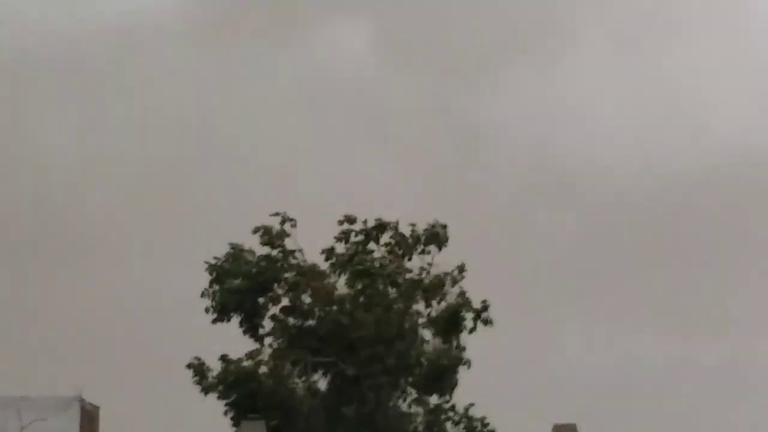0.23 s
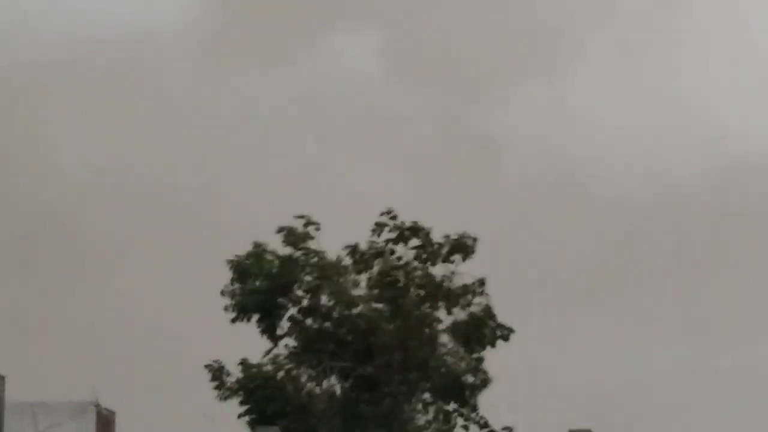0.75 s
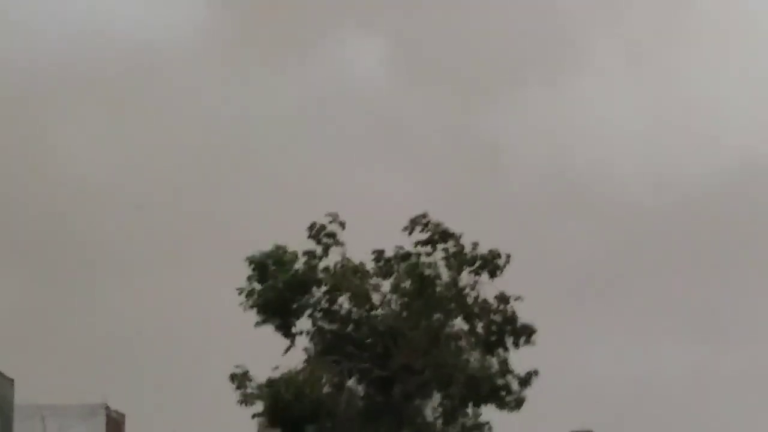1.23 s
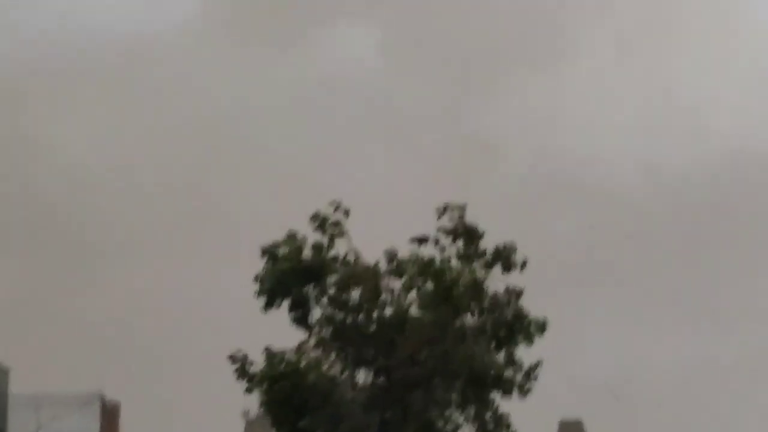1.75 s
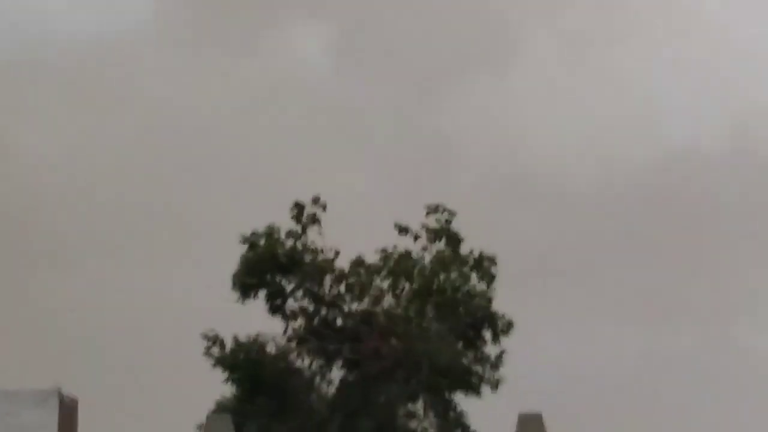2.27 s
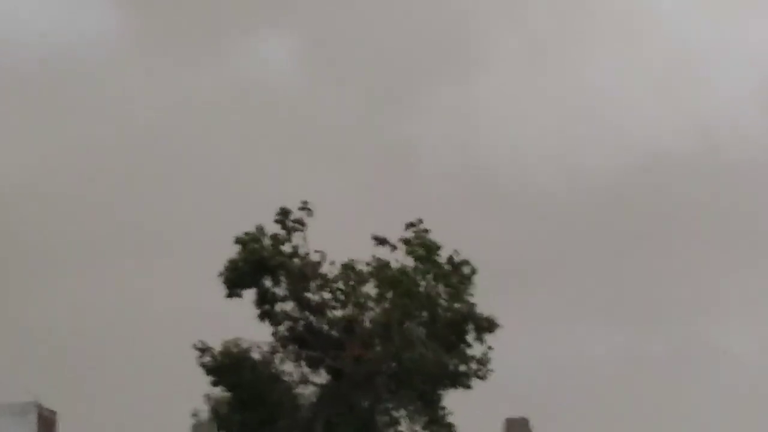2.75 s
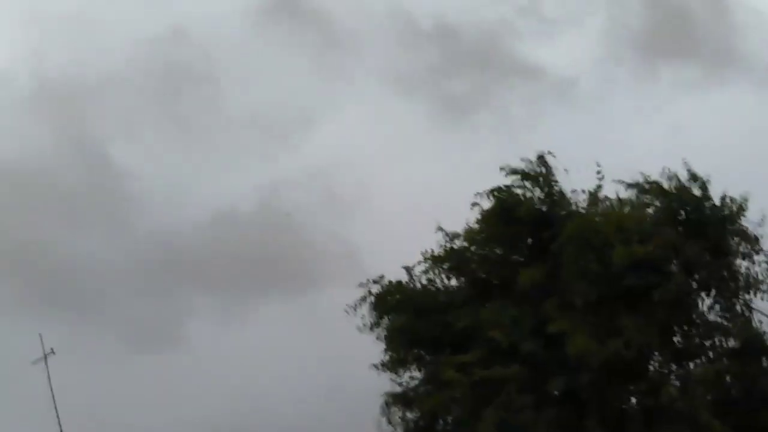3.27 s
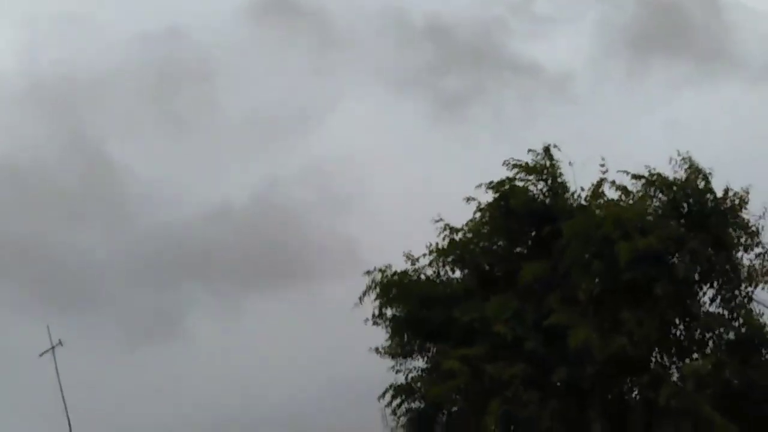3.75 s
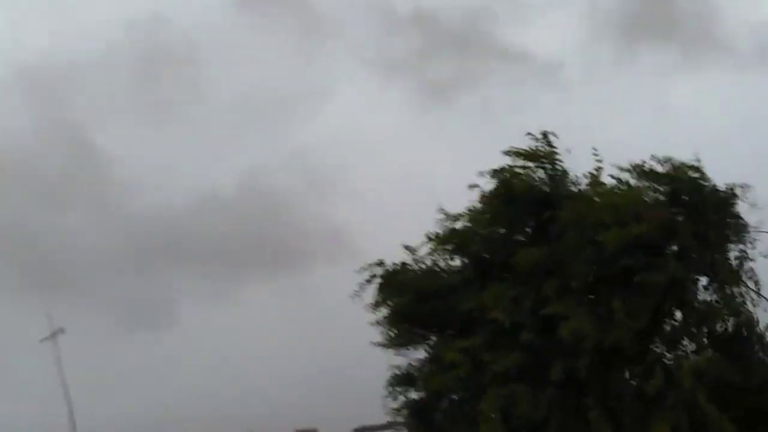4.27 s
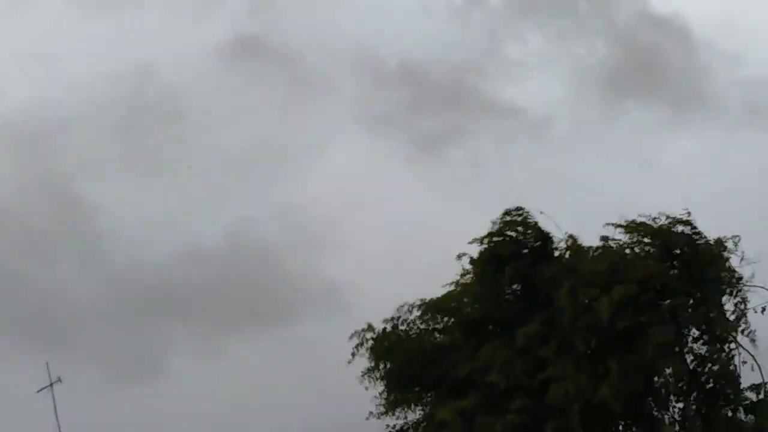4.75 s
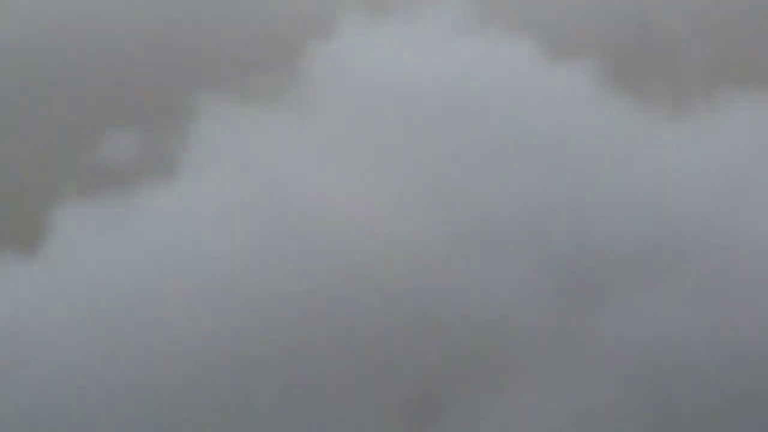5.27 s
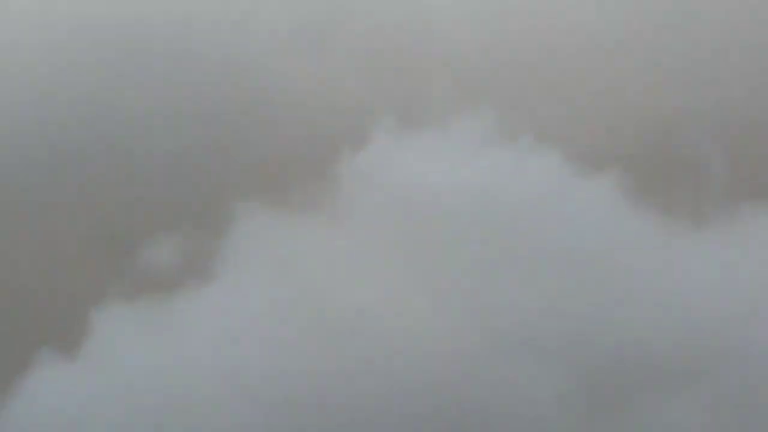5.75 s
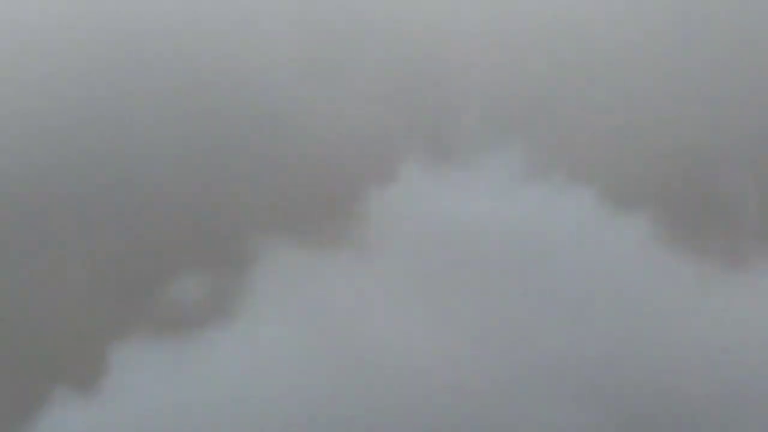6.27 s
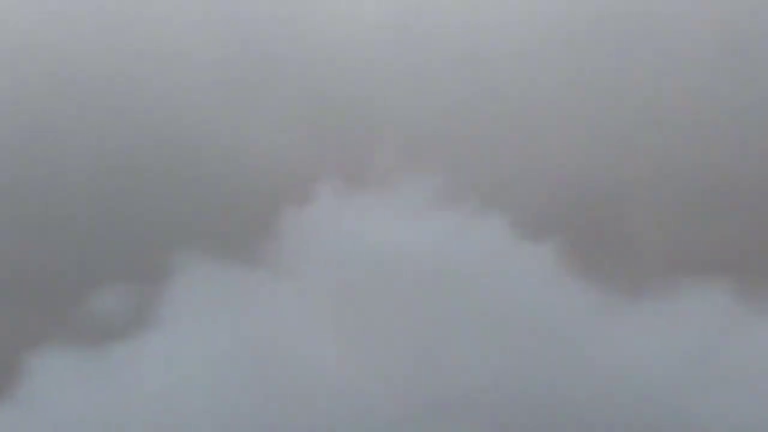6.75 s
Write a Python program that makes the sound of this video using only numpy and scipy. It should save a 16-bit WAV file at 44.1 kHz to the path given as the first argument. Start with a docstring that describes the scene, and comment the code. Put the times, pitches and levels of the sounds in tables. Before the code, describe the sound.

Stormy gusts slam a microphone with violent rumble, thumps and ragged roar, then ease into hissing, rustling leaves across three abruptly separated outdoor passages.

```python
"""Storm wind on a microphone

Three passages of outdoor wind, split by short silences, reach a left and a right microphone opening (port).
Gusts buffet each port: random pushes make a low rumble, and bursts of noise make a rough roar.
Single thumps, crackles, ticks and two spells of brushing come on top, all close to the ports.
Behind them, shaped noise makes rustling leaves, bright bursts, faint tones, a metallic rattle and far wind.
These surroundings are heard on the left, and only very weakly on the nearly shut right port."""
import sys
import numpy as np
from scipy import signal
from scipy.fft import rfft, irfft, next_fast_len
from scipy.io import wavfile
from scipy.ndimage import uniform_filter1d, map_coordinates

SR = 44100
rng = np.random.default_rng(int(sys.argv[2]) if len(sys.argv) > 2 else 0)


def store_pcm(level_fs):
    """Save levels as 16-bit WAV."""
    pcm = np.round(np.clip(level_fs, -1, 1) * 32767).astype(np.int16)
    wavfile.write(sys.argv[1], SR, np.atleast_2d(pcm).T)


N = 309141
TIME = np.arange(N) / SR  # seconds

# Tone colour of the large eddies (whirls of air), the small ones and their sharpest spits:
# columns: pitch_hz, relative_level_db_per_hz
LARGE_EDDY_COLOUR = [(15, -45.5), (30, -29.5), (45, -25.5), (62, -5), (90, 1), (120, -3), (160, -8.5),
                     (240, -16.5), (400, -38), (1500, -81)]
SMALL_EDDY_COLOUR = [(30, -47), (110, -12.5), (190, -0.5), (300, 1.5), (420, -5), (600, -11), (850, -25),
                     (1450, -36), (2500, -50.5), (6000, -72.5)]
SPIT_COLOUR = [(300, -15), (700, 26.5), (1300, 3), (2200, -7), (4000, -24), (8000, -26.5), (14000, -74)]
# Light breeze between gusts, one value per passage: level_db
BREEZE_LEFT_DB = [-42.5, -39.5, -43.5]
BREEZE_RIGHT_DB = [-40.5, -41.5, -46]
# Gusts that hit the microphone: start_s, hold_s, left_rumble_db, right_rumble_db
GUSTS = [(0.29, 0.028, -50, -40), (0.59, 0.16, -49, -31.5), (0.82, 0.064, -43.5, -33.5),
         (1.14, 0.035, -30.5, -28), (1.24, 0.064, -23, -29), (1.37, 0.049, -14.5, -16.5),
         (1.45, 0.05, -9.5, -19), (1.53, 0.049, -13, -21), (1.64, 0.07, -25.5, -26),
         (1.74, 0.057, -14, -10), (1.927, 0.043, -8.5, -32), (2.035, 0.033, -7.5, -6),
         (2.15, 0.071, -6, -10.5), (2.29, 0.056, -9, -18.5), (2.37, 0.25, -13.5, -10),
         (2.67, 0.06, -13.5, -15.5), (2.75, 0.18, -12, -19), (3.015, 0.055, -15.5, -12.5),
         (3.19, 0.062, -36.5, -20), (3.32, 0.03, -39, -23.5), (3.45, 0.11, -24, -25.5),
         (3.61, 0.02, -43, -31.5), (3.86, 0.13, -26, -44), (4.04, 0.06, -33.5, -40),
         (4.35, 0.046, -28, -50), (4.83, 0.16, -36.5, -32.5), (5.31, 0.04, -31.5, -48.5),
         (5.49, 0.4, -28.5, -34), (5.89, 0.076, -39, -24.5), (6.02, 0.084, -43, -36.5),
         (6.735, 0.043, -31.5, -33), (6.9, 0.062, -43, -35)]
GUST_RISE_DB_PER_S, GUST_FALL_DB_PER_S = 354, 271
# Moments when the flow tears off the ports and roars: start_s, hold_s, left_db, right_db
TEARS = [(1.46, 0.1, -26, -42), (1.75, 0.1, -27.5, -31.5), (1.935, 0.035, -18.5, -52.5),
         (2.056, 0.027, -8.5, -13), (2.116, 0.028, -9.5, -30), (2.217, 0.012, -9, -26),
         (2.305, 0.09, -15.5, -28), (2.41, 0.085, -14.5, -17.5), (2.54, 0.047, -9, -21),
         (2.736, 0.048, -10.5, -38), (2.8, 0.12, -18.5, -45.5), (3.028, 0.033, -10, -28.5)]
TEAR_RISE_DB_PER_S, TEAR_FALL_DB_PER_S = 606, 397


def buffet(breeze_db, channel, edge_offset_db, edge_growth, spit_db):
    """Turbulence at one port: the harder the wind, the more its small, sharp eddies are heard."""
    gust_db = blows(GUSTS, GUST_RISE_DB_PER_S, GUST_FALL_DB_PER_S, channel=channel)
    breeze = amp(per_passage(breeze_db)) * flicker(rate_hz=6.3, depth_db=-1.0)
    pressure_db = 20 * np.log10(np.hypot(amp(gust_db), breeze))
    tearing_db = blows(TEARS, TEAR_RISE_DB_PER_S, TEAR_FALL_DB_PER_S, channel=channel)

    # about 300 eddies a second, each one push or pull on the diaphragm
    eddies = rng.standard_normal(N) * (rng.random(N) < 300 / SR)
    large = steadied(coloured(eddies, LARGE_EDDY_COLOUR), span_s=0.073) * amp(pressure_db)

    # their sharp edges grow faster than the rumble until the pressure reaches -13 dB
    edge_db = pressure_db + edge_offset_db + edge_growth * np.minimum(pressure_db + 13.0, 0)
    edges = coloured(eddies * flicker(rate_hz=20, depth_db=5.5), SMALL_EDDY_COLOUR) * amp(edge_db)

    # small eddies come in bursts, and the peaks of the bursts spit
    bursts = flicker(rate_hz=45.0, depth_db=5.5)
    small = steadied(noise(SMALL_EDDY_COLOUR) * bursts, span_s=0.036) * amp(tearing_db)
    spit_level_db = tearing_db + spit_db + 0.4 * (tearing_db + 21.5)
    spits = noise(SPIT_COLOUR) * unit(bursts ** 0.98) * amp(spit_level_db)
    return large + edges + small + spits


# Single eddies that thump or slap a port: time_s, peak_db, port (0 left, 1 right), core_width_s
PUFFS = [(0.615, -21, 1, 0.001), (1.14, -18.5, 1, 0.00069), (1.158, -15, 0, 0.00072),
         (1.374, -12.5, 1, 0.00078), (1.631, -6, 0, .00073), (1.749, -10, 1, 0.00042),
         (1.799, -7, 0, 0.00039), (1.837, -4.5, 0, 0.00062), (1.926, -8.5, 0, 0.00037),
         (1.939, -1.5, 0, 0.00037), (2.012, -7.5, 0, 0.00026), (2.057, -5, 1, 0.00025),
         (2.064, 1.5, 0, .0005), (2.117, -3.5, 0, 0.00027), (2.142, -4, 0, 0.00033), (2.201, -1, 1, .00073),
         (2.219, -3.5, 0, 0.00023), (2.365, -0.5, 0, 0.00036), (2.386, -5.5, 0, 0.00033),
         (2.537, -5, 0, 0.00034), (2.587, -0.5, 0, 0.00027), (2.684, -1.5, 0, 0.00032),
         (3.02, -3, 1, 0.00052), (3.203, -5.5, 1, 0.00063), (3.354, -11.5, 1, 0.0014),
         (3.458, -12, 0, 0.00077), (3.54, -7.5, 0, 0.00071), (3.732, -17.5, 1, 0.00085),
         (3.87, -15, 0, 0.0011), (3.956, -13, 0, 0.00084), (4.916, -20, 1, 0.001),
         (4.982, -16.5, 1, 0.00069), (6.914, -17.5, 1, 0.0008)]


def puffs():
    """A lone eddy sweeps a port: a broad thump around a tight core."""
    out = np.zeros((2, N))
    for time_s, peak_db, port, core_s in PUFFS:
        near = abs(TIME - time_s) < .04
        t = TIME[near] - time_s
        sharp = np.clip(0.47 + 0.016 * peak_db, 0, 1)  # stronger eddies have more core
        shape = (1 - sharp) * vortex(t, 2.4 * core_s) + sharp * vortex(t, core_s)
        out[int(port > .5), near] += amp(peak_db) * shape
    return out


def vortex(t, width_s):
    """Pressure under a passing whirl of air: a suction between two soft pushes."""
    u = (t / width_s) ** 2
    return (u - 1) * np.exp(-u / 2)


# The diaphragm crackles at the height of the gust:
# columns: time_s, left_peak_db, right_peak_db, half_length_s, top_hz; peaks are before the final low-pass
CRACKLES = [(2.413, -11, -4, 0.0015, 2700), (2.552, -16, -46, 0.0022, 2000),
            (2.562, -19.5, -45, 0.0012, 2200), (2.585, -17, -46, 0.003, 1100),
            (2.746, -9, -42, 0.002, 1300)]
CRACKLE_LIMIT_HZ = 8500


def crackles():
    """A few milliseconds of ragged flutter when the flow slams a port: brief bursts of filtered noise."""
    out = np.zeros((2, N))
    for time_s, left_db, right_db, length_s, top_hz in CRACKLES:
        near = abs(TIME - time_s) < .02
        band = signal.butter(2, [500, np.clip(top_hz, 700, 9000)], "bandpass", fs=SR, output="sos")
        swell = np.exp(-((TIME[near] - time_s) / length_s) ** 2)
        burst = signal.sosfilt(band, rng.standard_normal((2, near.sum())) * swell)
        out[:, near] += burst / abs(burst).max(1, keepdims=True) * amp([[left_db], [right_db]])
    return signal.sosfilt(signal.butter(8, CRACKLE_LIMIT_HZ, fs=SR, output="sos"), out)


# Ticks and knocks on the housing beside the right port: time_s, peak_db, ring_hz, decay_s
TICKS = [(3.943, -19, 400, 0.0006), (4.073, -19, 220, 0.0005), (4.103, -16, 1200, 0.00013),
         (4.164, -19, 800, 0.0003), (4.166, -12.5, 420, 0.0005), (5.591, -32, 4500, 0.0003),
         (6.575, -14.5, 5400, 0.0001), (6.735, -14.5, 1100, 0.00009)]


def ticks():
    """Each touch is one clean, ringing pulse that the housing quickly damps."""
    out, t = np.zeros(N), np.arange(2048) / SR
    for time_s, peak_db, ring_hz, decay_s in TICKS:
        pulse = t * np.exp(-t / decay_s) * np.sin(2 * np.pi * ring_hz * t)
        out[round(time_s * SR):][:len(t)] += amp(peak_db) * pulse / abs(pulse).max()
    return out


# Tone colour of the brushing: pitch_hz, relative_level_db_per_hz
BRUSH_COLOUR = [(150, 5), (400, -1.5), (1200, -7.5), (2500, -10.5), (5000, -16.5), (8000, -22.5),
                (10500, -57)]
# Something presses harder over the right port until it slips off, and later grazes it lightly:
# columns: start_s, hold_s, level_db
BRUSH_STROKES = [(3.96, 0.11, -46), (4.075, 0.06, -39), (4.165, 0.009, -32), (4.19, 0.16, -59),
                 (6.57, 0.16, -56), (6.735, 0.1, -53)]
BRUSH_RISE_DB_PER_S, BRUSH_FALL_DB_PER_S = 900, 1300


def brush():
    """Scratchy friction right at the port: noise with a fast, rough flicker."""
    level_db = blows(BRUSH_STROKES, BRUSH_RISE_DB_PER_S, BRUSH_FALL_DB_PER_S)
    return noise(BRUSH_COLOUR) * flicker(rate_hz=300, depth_db=7.0) * amp(level_db)


# Level of the trees between surges, one value per passage: level_db
CALM_RUSTLE_DB = [-44.5, -45, -51.5]
# Gusts that run through the trees: peak_s, half_length_s, rise_above_calm_db
SURGES = [(0.15, 0.32, 4.5), (1.202, 0.64, 3), (2.422, 0.24, 2), (3.346, 0.12, 6), (3.927, 0.14, 3),
          (4.528, 0.14, 4), (4.94, 0.4, 10.5), (5.74, 0.17, 2.5), (6.043, 0.12, 7), (6.712, 0.4, 8.5)]


def rustle_db():
    """The trees never rest, and each gust that runs through them lifts the rustle in a smooth swell."""
    swells_db = sum(db * np.exp(-((TIME - peak_s) / length_s) ** 2) for peak_s, length_s, db in SURGES)
    return per_passage(CALM_RUSTLE_DB) + swells_db


# Tone colour of each passage's leaves, broad, fine and further off: pitch_hz, relative_level_db_per_hz
BROAD_LEAVES = [(1000, -18.5), (2000, -8), (2600, -4.5), (3200, -1), (3850, 3.5), (4400, -1.5),
                (5200, -12.5), (6500, -18.5), (9000, -28), (14000, -35.5)]
FINE_LEAVES = [(1000, -14), (2400, -10), (3300, -7), (4300, -3.5), (5200, -0.5), (6000, 3), (7000, -4.5),
               (8300, -16.5), (10000, -57), (14000, -74)]
FAR_LEAVES = [(1000, -9.5), (2300, -10), (3200, -8), (4100, -0.5), (5200, 1), (6400, 3.5), (7100, -0.5),
              (7900, -36), (12000, -48)]


def trees(rustle, passages):
    """Each passage has its own kind of leaves, all following one rustle level."""
    broad = whipped(foliage(BROAD_LEAVES, patchy_db=1.0))
    fine = foliage(FINE_LEAVES, patchy_db=1.3)
    far = foliage(FAR_LEAVES, patchy_db=2.3, mids_db=7.0)
    return amp(rustle) * (passages[0] * broad + passages[1] * fine + passages[2] * far)


def foliage(spectrum, patchy_db, mids_db=0):
    """Countless leaf collisions: three branches of noise, each fluttering in its own time."""
    branches = sum(noise(spectrum) * flicker(rate_hz=80, depth_db=0.5) for _ in range(3))
    return patchy(branches, patchy_db, mids_db) * flicker(rate_hz=21, depth_db=1.0)


# The strong gust whips the broad leaves harder; speeds are playback speeds, 1 = unchanged
WHIP_S, WHIP_TIME_S, SPEED_BEFORE, SPEED_AFTER = 2.3, 0.22, 0.99, 1.1


def whipped(x):
    """Leaves that flap faster hiss higher: the sound is read through at a rising speed."""
    progress = (1 + np.tanh((TIME - WHIP_S) / WHIP_TIME_S)) / 2
    speed = SPEED_BEFORE + (SPEED_AFTER - SPEED_BEFORE) * progress
    return map_coordinates(x, [np.cumsum(speed)], order=3, mode="mirror")


# Short bursts of bright noise: time_s, level_db, half_length_s
BRIGHT_BURSTS = [(3.246, -35.5, 0.0042), (3.272, -36, 0.002), (3.292, -45, 0.036), (3.886, -38.5, 0.034),
                 (6.563, -40, 0.007), (6.595, -47, 0.034)]
# Their tone colour: pitch_hz, relative_level_db_per_hz
BRIGHT_COLOUR = [(3000, -14), (5900, 13), (7200, 5.5), (9500, -1.5), (14000, -20)]
# Twigs thrash in a strong surge: their dB, at this rustle dB, and dB gained per dB of rustle
THRASH_DB, THRASH_AT_DB, THRASH_GROWTH = -41, -34.5, 5.7


def bright_noise(rustle):
    """Bright, grainy noise: in short bursts, and as thrashing twigs when the rustle peaks."""
    bursts = sum(amp(db) * np.exp(-((TIME - time_s) / length_s) ** 2) for time_s, db, length_s in BRIGHT_BURSTS)
    thrash = amp(THRASH_DB + THRASH_GROWTH * (rustle - THRASH_AT_DB))
    return (bursts + thrash) * noise(BRIGHT_COLOUR) * flicker(rate_hz=550, depth_db=3.5)


# Resonances of something small and metallic: pitch_hz, width_hz, level_db
RATTLE_MODES = [(3600, 260, -50.5), (4610, 230, -49), (7800, 300, -66), (8850, 200, -66)]
RATTLE_S, RATTLE_HOLD_S, RATTLE_RISE_S, RATTLE_FALL_DB_PER_S = 3.24, 0.081, .004, 94


def rattle():
    """A brief, bright shiver of metal: it starts at once, keeps shaking, then dies away."""
    t = np.maximum(TIME - RATTLE_S, 0)
    fall = amp(-RATTLE_FALL_DB_PER_S * np.maximum(t - RATTLE_HOLD_S, 0))
    level = np.minimum(t / RATTLE_RISE_S, 1) * fall
    return level * sum(amp(db) * fuzzy(hz, width_hz) for hz, width_hz, db in RATTLE_MODES)


# Faint narrow tones and one broad, wavering noise band near 2400 Hz:
# columns: start_s, end_s, first_hz, last_hz, width_hz, level_db (midway)
FAINT_TONES = [(0.75, 1.15, 1860, 1760, 70, -55.5), (4.732, 5.075, 1670, 1506, 60.3, -52),
               (5.25, 5.841, 1202, 1165, 36, -49), (5.858, 6.58, 1178, 1187, 36, -50.5),
               (6.19, 6.55, 2480, 2380, 200, -58)]
TONE_WAVER = 0.00502  # typical share of the pitch


def faint_tones():
    """Narrow bands of noise sound as fuzzy tones that glide, waver, swell and fade; one is broader."""
    out, waver = np.zeros(N), 1 + TONE_WAVER * wander(rate_hz=4.02)
    for start, end, first_hz, last_hz, width_hz, db in FAINT_TONES:
        progress = np.clip((TIME - start) / (end - start), 0, 1)
        tone = fuzzy((first_hz + (last_hz - first_hz) * progress) * waver, width_hz)
        swell = np.sqrt(abs(np.sin(np.pi * progress)))
        out += amp(db) * swell * steadied(tone, span_s=0.04)
    return out * flicker(rate_hz=9.3, depth_db=2.0)


# Tone colour of the far wind: pitch_hz, relative_level_db_per_hz
ROAR_COLOUR = [(70, 1), (180, 7), (320, 7), (550, 2), (800, 0.5), (1100, -3.5), (1600, -4.5), (2200, -19),
               (3500, -34.5), (7000, -61.5)]
# Wind over the far roofs, one value per passage: level_db
ROAR_DB = [-45.5, -45, -44]


def far_wind():
    """A dull roar of noise, with random level changes by pitch region, deeper near 2700 Hz."""
    return patchy(noise(ROAR_COLOUR), depth_db=2.0, mids_db=4.5) * amp(per_passage(ROAR_DB))


# The three passages: start_s, end_s, fade_in_s (time constant)
PASSAGES = [(0, 3.098, 0.00027), (3.133, 5.072, 0.2), (5.158, 7.1, 0.24)]


def passage_gain(start, end, fade):
    """A passage fades in and ends in a quick 17 ms fade."""
    fade_in = 1 - np.exp(-np.maximum(TIME - start, 0) / fade)
    return fade_in * np.clip((end - TIME) / 0.017, 0, 1)


def per_passage(values):
    """Holds one value through each passage and switches in the middle of each silence."""
    number = sum(TIME > (before[1] + after[0]) / 2 for before, after in zip(PASSAGES, PASSAGES[1:]))
    return np.asarray(values)[number]


def blows(rows, rise_db_per_s, fall_db_per_s, channel=0):
    """Level in dB of overlapping events, each of which rises, holds and falls away."""
    power = np.full(N, 1e-12)
    for start, hold, *levels_db in rows:
        near = slice(max(int((start - .5) * SR), 0), int((start + hold + .5) * SR))
        t = TIME[near] - start
        slope_db = rise_db_per_s * np.minimum(t, 0) - fall_db_per_s * np.maximum(t - hold, 0)
        power[near] += amp(levels_db[channel] + slope_db) ** 2
    return 10 * np.log10(power)


def amp(db):
    """Decibels to gain."""
    return 10 ** (np.asarray(db) / 20)


def unit(x):
    """Scales to an rms (average strength) of 1."""
    return x / np.sqrt(np.mean(x ** 2) + 1e-20)


def noise(spectrum):
    """Noise of rms 1 with the given tone colour."""
    return coloured(rng.standard_normal(N), spectrum)


def coloured(x, spectrum):
    """Filters x by a table of pitch and dB, then scales it to an rms of 1."""
    size = next_fast_len(N + 4096)
    hz, db = np.transpose(spectrum)
    gain = amp(np.interp(np.log(np.fft.rfftfreq(size, 1 / SR) + 1), np.log(hz), db))
    return unit(irfft(rfft(x, size) * gain, size)[:N])


def wander(rate_hz):
    """Smooth random drift of rms 1: noise with movement above the rate filtered down."""
    lowpass = signal.butter(2, rate_hz, fs=SR, output="sos")
    return unit(signal.sosfilt(lowpass, rng.standard_normal(N + SR))[SR:])  # skips the filter's start


def flicker(rate_hz, depth_db):
    """A randomly varying gain of mean power 1."""
    return unit(amp(depth_db * 2 * np.tanh(wander(rate_hz) / 2)))


def steadied(x, span_s):
    """Evens out the power over the span and keeps the faster lumps."""
    size = max(int(span_s * SR), 8)
    power = uniform_filter1d(uniform_filter1d(x ** 2, size), size)
    return x / np.sqrt(abs(power) + 1e-9)


def patchy(x, depth_db, mids_db=0):
    """Lets narrow pitch regions swell and sink at random, optionally deeper near 2700 Hz."""
    hz, _, z = signal.stft(x, SR, nperseg=512)
    patches = rng.standard_normal(z.shape)
    for _ in range(2):  # smooth over pitch, then over time
        patches = uniform_filter1d(uniform_filter1d(patches, size=3, axis=0), size=15, axis=1)
    swing = 2 * np.tanh(unit(patches) / 2)
    mids = mids_db * np.exp(-((hz[:, None] - 2700) / 1100) ** 2) * np.minimum(swing, .5)
    return unit(signal.istft(z * amp(depth_db * swing + mids), nperseg=512)[1][:N])


def fuzzy(hz, width_hz):
    """Narrow noise around a pitch, which may move."""
    phase = 2 * np.pi * np.cumsum(hz * np.ones(N)) / SR
    return unit(wander(width_hz / 2) * np.cos(phase) + wander(width_hz / 2) * np.sin(phase))


def scene():
    """Buffeting on both ports, with the surroundings on the left and 36 dB weaker on the right."""
    passages, rustle = [passage_gain(*row) for row in PASSAGES], rustle_db()
    left = buffet(BREEZE_LEFT_DB, channel=0, edge_offset_db=-14.5, edge_growth=0.64, spit_db=-19.5)
    right = buffet(BREEZE_RIGHT_DB, channel=1, edge_offset_db=-15.5, edge_growth=0.55, spit_db=-20.0)
    right = right + brush() + ticks()
    at_ports = sum(passages) * (np.array([left, right]) + puffs() + crackles())
    background = sum(passages) * (far_wind() + faint_tones() + bright_noise(rustle))
    around = trees(rustle, passages) + rattle() + background
    return at_ports + around * amp([[0], [-36]])


CUTOFF_HZ = 14400


def record(dry):
    """The microphone drops the deepest bass, rounds off peaks near full scale and cuts the top treble."""
    thinned = signal.sosfilt(signal.butter(2, 28, "highpass", fs=SR, output="sos"), dry)
    rounded = thinned / (1 + thinned ** 4) ** (1 / 4)
    lowpass = signal.firwin(511, CUTOFF_HZ, window=("kaiser", 9), fs=SR)
    return signal.oaconvolve(rounded, lowpass[None], "same")


dry = scene()
out = record(dry)
store_pcm(out)
```